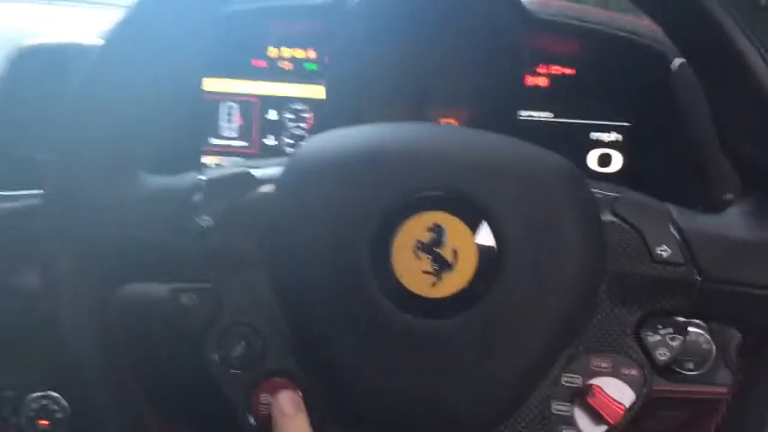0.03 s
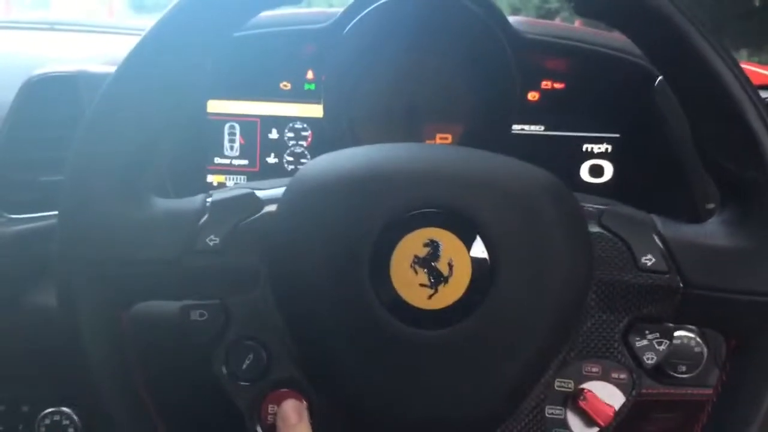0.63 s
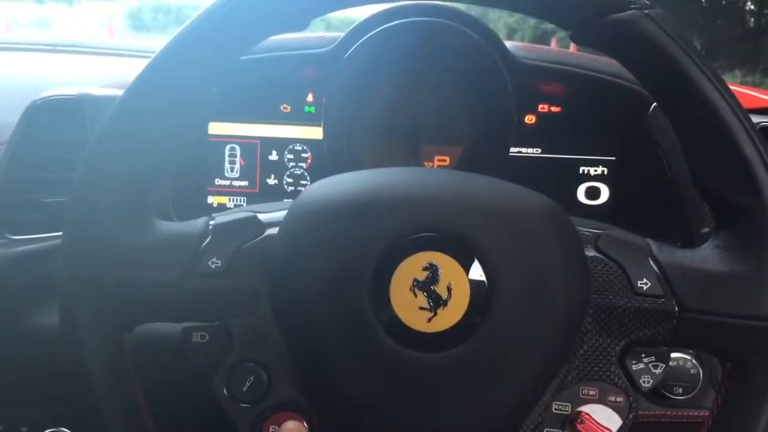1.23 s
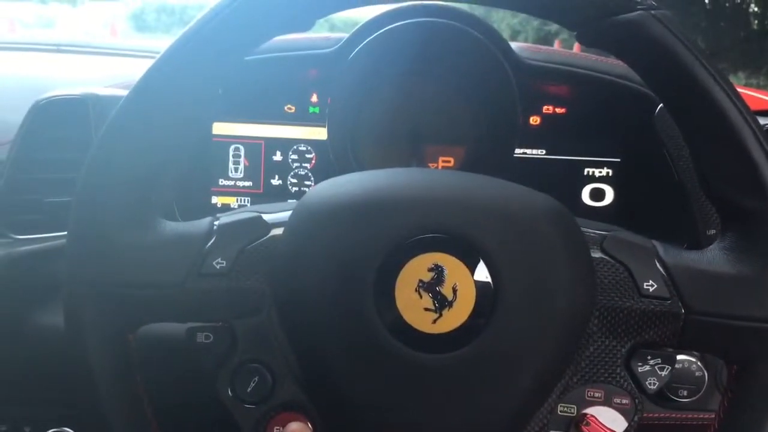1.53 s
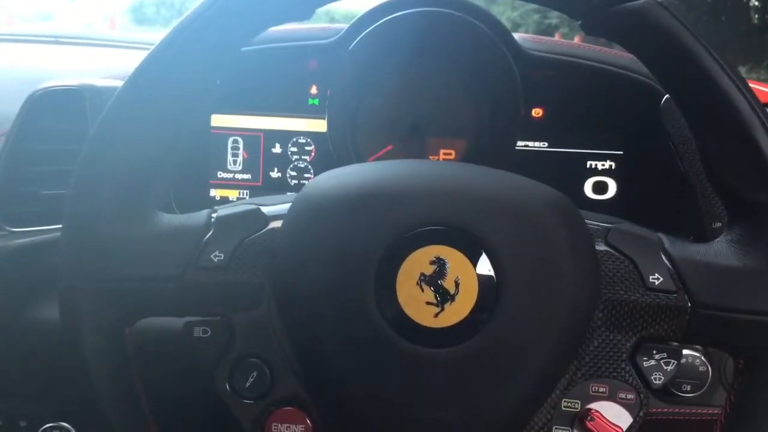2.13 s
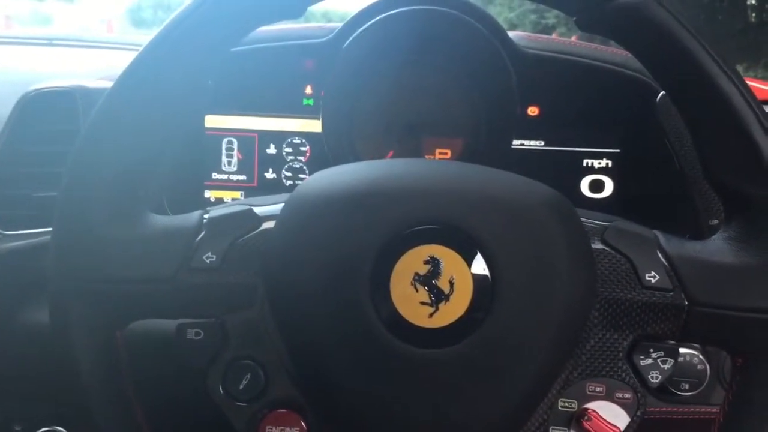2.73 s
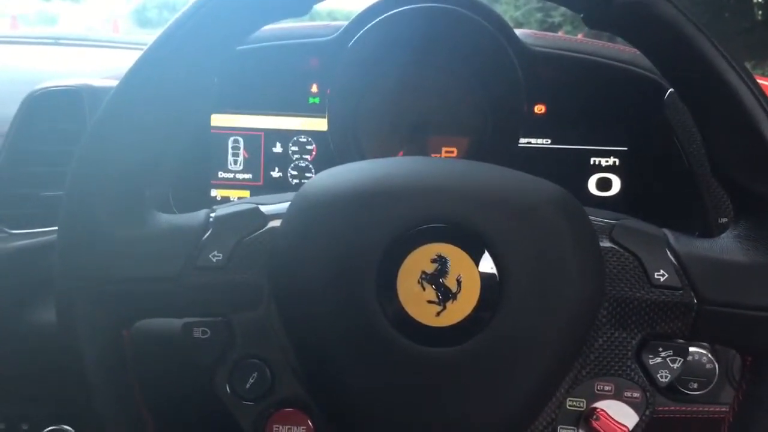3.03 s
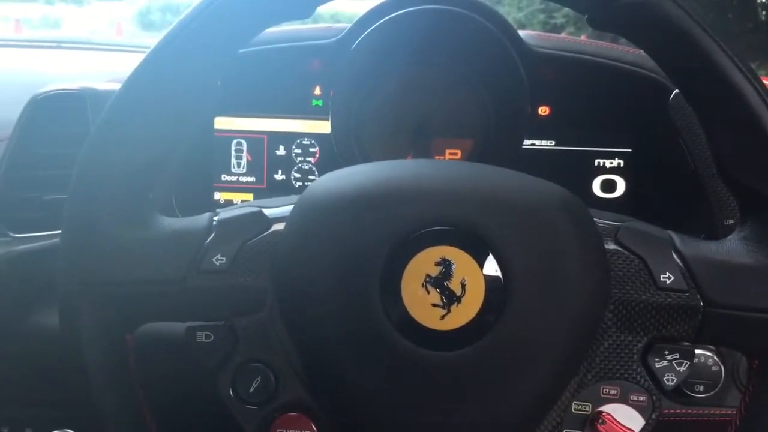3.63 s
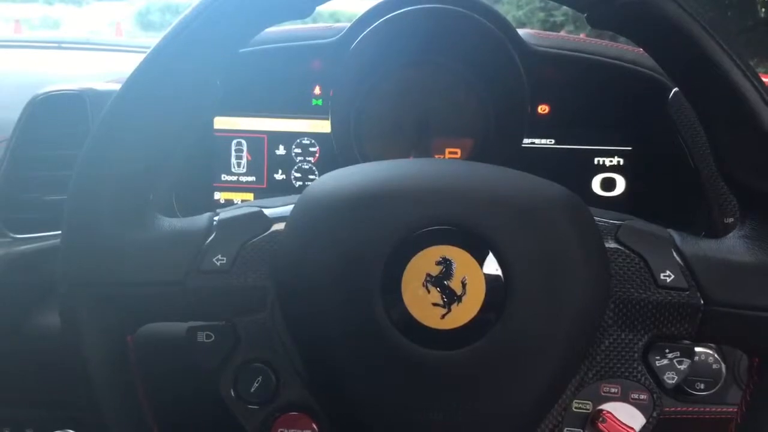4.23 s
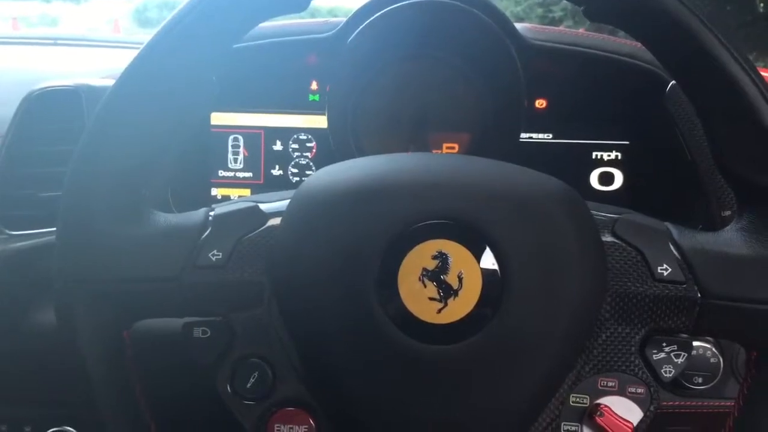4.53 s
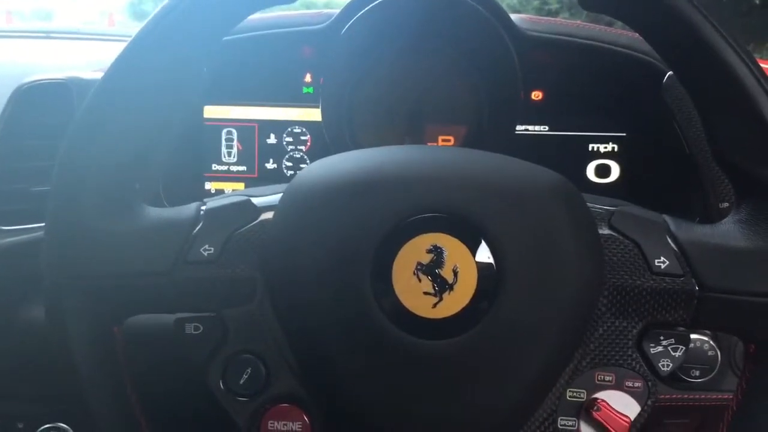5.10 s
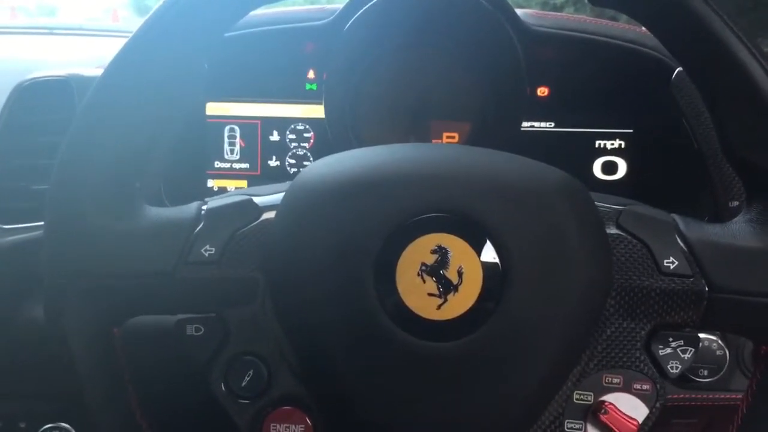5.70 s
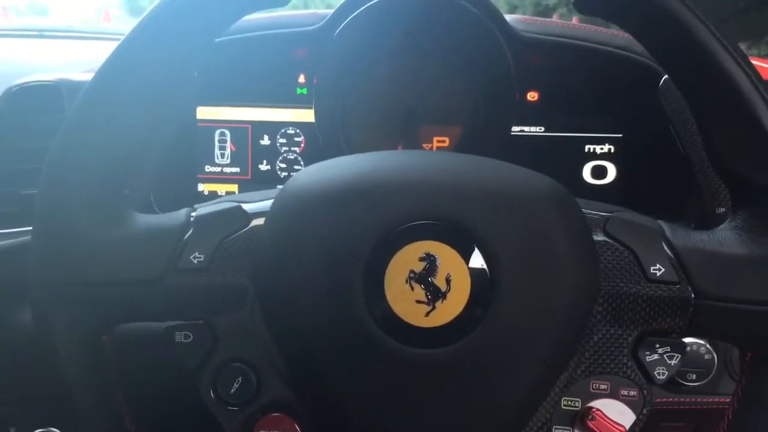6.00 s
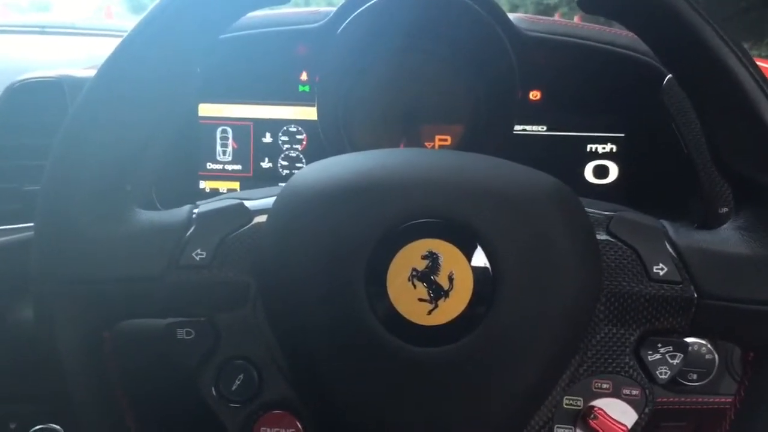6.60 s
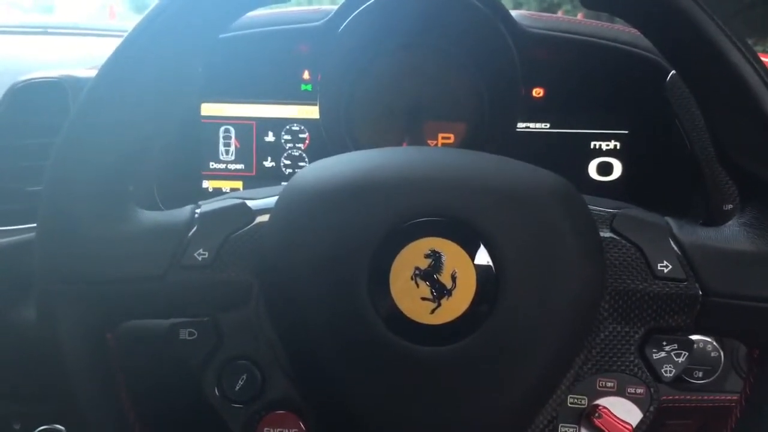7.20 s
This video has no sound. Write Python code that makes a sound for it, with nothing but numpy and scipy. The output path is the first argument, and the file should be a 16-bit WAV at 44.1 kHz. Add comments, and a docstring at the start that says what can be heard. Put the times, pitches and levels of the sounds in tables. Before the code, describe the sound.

A sports car's starter cranks briefly, the V8 fires with a loud flare, then sinks to a steady idle, heard from inside.

```python
"""A sports car's V8 starts, flares and sinks to idle, heard from the driver's seat.
Over the ventilation fan a relay clicks and the starter's gears grind against each compression.
Once the engine catches, its periodic firings drive the exhaust, whose harmonics boom and growl as they
sweep through pipe and cabin resonances. The boom drops away when the exhaust flaps close;
combustion roar, valve rattle and injector ticks carry on at the pace of the crankshaft."""
import numpy as np
from scipy import signal
from scipy.fft import rfft, irfft, next_fast_len
from scipy.io import wavfile
from scipy.ndimage import uniform_filter1d, map_coordinates
import sys
import numpy as np
from scipy import signal
from scipy.fft import rfft, irfft, next_fast_len
from scipy.io import wavfile
from scipy.ndimage import uniform_filter1d, map_coordinates

SR = 44100
rng = np.random.default_rng(int(sys.argv[2]) if len(sys.argv) > 2 else 0)


def materialize(psi):
    """Save the field psi as 16-bit PCM at rate SR to the path in sys.argv[1].

    A 1-D psi becomes a single channel; in a 2-D psi each row is a channel.
    """
    bounded = np.clip(np.atleast_2d(psi).T, -1, 1)
    quanta = np.round(bounded * 32767).astype(np.int16)
    wavfile.write(sys.argv[1], SR, quanta)


N = 324135

FIRE_S, STUMBLE_END_S = 1.7, 2  # first firing; the boom's start-up stumble has died away
SETTLE_S, SETTLED_S = 5.38, 6.04  # the idle grows gruffer between these times
# the throttle opens for the flare, shuts, then opens a little to cushion the fall: time_s, load_db
LOAD = [(1.7, 1), (1.82, 16), (2.05, 14), (2.14, 9.5), (2.4, 1), (2.76, 0), (2.92, 3.5), (3.4, -1.5),
        (4.1, -2), (5.6, -1.5), (6.9, -1.5), (7.35, -0.5)]
# cylinders that fail to fire: centre_s, half_length_s, share_lost, shudder_db
MISFIRES = [(1.804, 0.016, 1, -31.5), (1.898, 0.0067, .7, -21.5), (2.475, 0.03, 0.66, -31)]


def boom(firing, rate, per_load=0.65, flutter_db=1.0, stumble_db=2.5, uneven_db=4.0, lope_db=1.0):
    """Forced resonance: each low exhaust order swells as it sweeps through a peak of pipes and cabin."""
    # exhaust orders: firing_multiple, flaps_open_db, closing_change_db
    orders = [(.5, -15.5, -3), (1, 2, -15), (1.5, -16.5, -14), (2, 1.5, -3.5), (2.5, -28, 6), (3, -6, -14)]
    # transmission of the tailpipes and cabin: frequency_hz, gain_db
    response = [(25, -48), (33, -28.5), (40, -18), (46, -29), (53, -28.5), (60, -46), (68, -33.5),
                (103, -29), (136, -17), (185, -26.5), (230, -38), (330, -44.5), (450, -60)]
    ragged_db = flutter_db + stumble_db * (1 - ramp(FIRE_S, STUMBLE_END_S)) + lope_db * flaps()
    out = np.zeros(N)
    for order, open_db, change_db in orders:
        db = open_db + change_db * flaps() + gain_at(order * rate, response)
        is_half_order = order % 1 > 0
        db += ragged_db * wobble(45) + uneven_db * is_half_order * wobble(20)
        out += amp(db) * np.sin(2 * np.pi * order * firing)
    return np.sqrt(2) * amp(per_load * curve(LOAD)) * ramp(1.76, 1.81) * out


def growl(firing, rate, per_load=0.48, flaps_db=-7, flutter_db=3.0):
    """Pipe resonance picks out the higher harmonics in turn as the engine speed changes."""
    # higher exhaust orders: firing_multiple, level_db
    orders = [(4, -6), (5, -2), (6, -6.5), (7, -7.5), (8, -7.5)]
    # resonances of the pipe: frequency_hz, gain_db
    response = [(170, -60), (240, -56.5), (295, -48.5), (350, -44.5), (420, -56.5), (500, -50.5),
                (560, -58), (610, -59.5), (780, -48.5), (1000, -62.5)]
    out = np.zeros(N)
    for order, order_db in orders:
        db = order_db + gain_at(order * rate, response) + flutter_db * wobble(30)
        out += amp(db) * np.sin(2 * np.pi * order * firing)
    return np.sqrt(2) * amp(per_load * curve(LOAD) + flaps_db * flaps()) * ramp(1.5, 1.85) * out


def exhaust_pulses(firing, rate, rasp=0.15, flaps_db=-7, cold_db=6, idle_rise_db=4):
    """Source and filter: each firing sends a gas pulse, with turbulence behind it, down the pipe."""
    # transmission of the exhaust pipe: frequency_hz, gain_db
    pipe = [(25, -29.5), (60, 7), (115, 14), (200, -15.5), (300, 6), (400, -3), (560, -10.5), (800, -20),
            (1500, -42), (6000, -68.5)]
    at = strikes(firing)
    cylinder_db = np.resize([1.5, -1, 1, -1, 2, -1.5, 0, -1], len(at))
    scatter_db = 1.3 * rng.standard_normal(len(at))
    # the cold cylinders burn most unevenly at the top of the flare
    roughness = np.interp(rate[at], [90, 130], [.7, 2.6])
    sizes = amp(roughness * (cylinder_db + scatter_db)) / np.sqrt(rate[at])
    pulses = unit(np.bincount(at, sizes, N)) + rasp * unit(bursts(at, sizes, t60=0.032) * noise())
    db = drive(rate, idle_db=-48, per_load=.9, per_octave_db=-1.5) + flaps_db * flaps()
    db += cold_db * swell(1.896, .05) + idle_rise_db * ramp(6.1, 6.4)
    return ramp(FIRE_S, 1.8) * amp(db) * heard(pulses, pipe)


def shudder(firing, rate, chug=0.97, lag_s=0.029, jolt_s=.055):
    """Forced vibration: exhaust gusts shake the floor, harder as the engine rocks after a misfire."""
    # response of the floor: frequency_hz, gain_db
    floor = [(20, -36), (42, 4.5), (65, -9.5), (130, 10.0), (190, 1.5), (300, -34.0), (900, -67.5)]
    gusts = noise() * throb(firing, chug)
    steady = amp(drive(rate, idle_db=-40, per_load=-0.4, per_octave_db=8))
    jolts = sum(amp(db) * swell(s + lag_s, jolt_s) for s, _, _, db in MISFIRES)
    return ramp(FIRE_S, 1.8) * (steady + jolts) * heard(gusts, floor)


def catch(level_db=-14.0, pipe_hz=119, attack_s=0.063, hold_s=0.059, release_s=0.0091):
    """The first firings excite one low natural mode of the exhaust pipe."""
    end = FIRE_S + attack_s + hold_s
    envelope = ramp(FIRE_S, FIRE_S + attack_s) * (1 - ramp(end, end + release_s))
    return np.sqrt(2) * amp(level_db) * envelope * np.sin(2 * np.pi * pipe_hz * np.arange(N) / SR)


def barks(attack_s=0.017):
    """Damped resonance: each surge of gas excites one mode of the exhaust, which then decays."""
    # surges of gas: start_s, level_db, t60_s, pitch_hz
    surges = [(1.909, -19.5, .25, 321), (1.998, -27.5, 0.56, 518), (2.861, -39, 1, 503),
              (4.459, -32, 0.25, 335)]
    return sum(amp(db) * decay(s, t60) * ramp(s, s + attack_s) * ringing(hz, width=0.017)
               for s, db, t60, hz in surges)


def drone(firing, level_db=-46, pitch_hz=250):
    """A narrow noise band, amplitude-modulated at the firing rate, hums as the idle settles."""
    envelope = amp(level_db) * ramp(SETTLE_S, SETTLED_S) * ramp(5.5, 6.6)
    return envelope * throb(firing, depth=.5) * ringing(pitch_hz, width=0.17)


def combustion(firing, roar_db):
    """Combustion radiates broadband noise, amplitude-modulated by the firings."""
    # combustion roar: frequency_hz, density_db
    spectrum = [(100, -27.5), (220, -1.5), (400, 0.5), (600, 4), (1100, -1), (1450, -2), (2350, -8),
                (2800, -13.5), (4500, -36.5), (15000, -44)]
    roar = heard(noise() * throb(firing, depth=0.15) * amp(1.4 * wobble(40)), spectrum)
    return ramp(1.66, 1.76) * amp(roar_db) * roar


def valve_gear(firing, roar_db, chatter_db=-4, clatter=0.83):
    """Impacts at twice the firing rate modulate a hiss; the valve covers chatter at their resonances."""
    # course of the valve hiss: time_s, level_db
    hiss_levels = [(1.88, -54), (1.98, -49.5), (2.14, -57), (2.7, -58), (3.05, -55.5), (4.3, -60),
                   (6.4, -61.5), (7.35, -60.5)]
    # valve hiss: frequency_hz, density_db
    spectrum = [(1200, -29), (2500, 0), (3600, 2.5), (4500, -0.5), (6200, -5.5), (7300, -13.5),
                (10300, -16), (12300, -13), (15000, -15.5)]
    hiss_db = curve(hiss_levels)
    at = strikes(2 * firing)
    taps = unit(bursts(at, amp(2.5 * rng.standard_normal(len(at))), t60=.03))
    hiss = heard(noise() * (1 + clatter * taps), spectrum)
    chatter = unit(sum(amp(4.5 * wobble(60)) * ringing(hz, width=.06) for hz in (1850, 2200)))
    return ramp(1.9, 1.901) * (amp(hiss_db) * hiss + amp(chatter_db + (roar_db + hiss_db) / 2) * chatter)


def starter(grind_db=-47.5, shake_db=-42, whine_db=-7, backlash=.014, compression_s=0.026):
    """Periodic tooth contact grinds and whines, hardest at each compression, as the engine rocks."""
    # whine of the pinion, slowed by the compressions: time_s, pitch_hz
    pinion = [(1.13, 1500), (1.2, 3100), (1.275, 3900), (1.335, 3400), (1.41, 2350), (1.45, 2300),
              (1.5, 2742), (1.65, 1648), (1.8, 1533)]
    # compressions that load the starter: centre_s, grind_db, shake_db
    compressions = [(1.18, -47.5, -54), (1.305, -45, -44), (1.419, -48.5, -40), (1.59, -53, -45),
                    (1.746, -48.5, -24.5)]
    # grinding teeth: frequency_hz, density_db
    spectrum = [(200, -19.5), (550, -0.5), (900, 1.5), (1500, 3), (2300, 2), (3000, -7.5), (4500, -10.5),
                (6300, -12), (7500, -24.5), (11000, -32.5), (15000, -25.5)]
    # response of the engine mounts: frequency_hz, gain_db
    mounts = [(16, -41.5), (33, -4.5), (45, -4), (80, -9.5), (300, -65.5)]
    load = amp(grind_db) + sum(amp(db) * swell(s, compression_s) for s, db, _ in compressions)
    rock = amp(shake_db) + sum(amp(db) * swell(s, compression_s) for s, _, db in compressions)
    mesh = np.cumsum(curve(pinion) * (1 + backlash * wobble(500))) / SR
    grind = heard(noise() * throb(mesh / 4, depth=0.49), spectrum)
    whine = sum(amp(2 * wobble(110)) * np.sin(2 * np.pi * mesh / k) for k in (1, 2, 4))
    gears = grind + amp(whine_db) * ramp(1.0, 1.37) * whine
    shake = ramp(1.15, 1.2) * heard(noise(), mounts)
    engaged = ramp(1.12, 1.163) * (1 - ramp(1.734, 2.2))
    return engaged * (load * gears + rock * shake)


def overrun(brush_db=-55, skate_db=-48):
    """Sliding friction: pawls brush the clutch ring, then skate as the engine overtakes the starter."""
    # rasp of the pawls: frequency_hz, density_db
    spectrum = [(1500, -21), (3500, 0), (6300, -3), (7500, -13.5), (15000, -19.5)]
    rasp = heard(noise() * amp(2.3 * wobble(250)), spectrum)
    level = amp(brush_db) * ramp(1.5, 1.501) + amp(skate_db) * ramp(1.64, 1.675)
    return level * (1 - ramp(1.77, 1.952)) * rasp


def clacks(ring_db=-5, attack_s=.009):
    """Impact excitation: gear blows scatter through the body as noise and ring the housing."""
    # starter gear clacks and small knocks: start_s, level_db, t60_s, pitch_hz, relative_crash_db
    impacts = [(1.126, -28, 0.19, 1860, -4.5), (1.157, -27.5, 0.074, 1900, -9.5),
               (1.16, -23, .1, 180, -41.5), (1.315, -32.5, 0.14, 935, -34.5),
               (1.407, -28.5, 0.11, 2330, -15.5), (1.565, -28, 0.097, 1950, -2),
               (1.635, -32.5, 0.12, 1780, -6.5), (1.734, -30.5, 0.075, 2260, -16),
               (1.84, -25, 0.083, 2430, -19), (1.915, -33.5, 0.12, 2280, -17),
               (4.339, -38.5, 0.16, 1100, -15), (6.944, -32.5, 0.082, 1980, -6)]
    # crash of the gears: frequency_hz, density_db
    spectrum = [(200, 3), (1000, -9), (1900, -1.5), (2600, -5), (4000, -7.5), (6000, -9.5), (8000, -17),
                (15000, -26)]
    crash, out = heard(noise(), spectrum), np.zeros(N)
    for s, db, t60, hz, crash_db in impacts:
        blow = amp(db) * decay(s, t60) * ramp(s, s + attack_s)
        out += blow * (amp(crash_db) * crash + amp(ring_db) * ringing(hz, width=0.044))
    return out


def clicks(gain_db=-5, t60=0.06):
    """Small, light parts resonate high: each relay or linkage impact rings in one band."""
    # relay and linkage impacts: start_s, level_db, pitch_hz
    impacts = [(1.0713, -36, 6700), (1.0815, -47.5, 13800), (1.1094, -53, 7800), (1.336, -45.5, 9100),
               (1.8682, -38.5, 6820), (1.878, -43.5, 13400)]
    return sum(amp(db + gain_db) * decay(s, t60) * ringing(hz, width=0.11) for s, db, hz in impacts)


def injectors(firing, level_db=-69, scatter_db=5, fade_db=-4):
    """An impulse train, two thin ticks a turn, is smeared by the bulkhead and softens at idle."""
    # injector tick: frequency_hz, density_db
    spectrum = [(3000, -36.5), (9000, -21.5), (11000, -13), (12300, -0.5), (13300, -14.5), (15000, -11.5)]
    at = strikes(firing / 2)
    sizes = amp(scatter_db * np.clip(rng.standard_normal(len(at)), -2, 1.3))
    smeared = uniform_filter1d(bursts(at, sizes, t60=.04), size=330)
    return amp(level_db + fade_db * ramp(5.0, 6.5)) * ramp(1.9, 3.3) * heard(smeared * noise(), spectrum)


def fan(level_db=-38.0, ease_db=-8, drift=0.0111):
    """Turbulent air rushes, easing once the engine runs; fan and fuel pump rotation adds wavering tones."""
    # ventilation rush: frequency_hz, density_db
    spectrum = [(20, -17.5), (60, -9.5), (140, -0.5), (235, 5), (320, -8.5), (500, -22.5), (1050, -18.5),
                (1400, -25), (2000, -26.5), (2350, -24.5), (3300, -34.5), (6000, -45.5), (9500, -52.5),
                (15000, -56)]
    # fuel pump and fan tones: pitch_hz, level_db
    tones = [(215, -56), (533, -67.5), (711, -76), (900, -63.5), (1626, -70), (2153, -66.5), (2842, -82),
             (5471, -87.5)]
    out = amp(level_db + 1.1 * wobble(9) + ease_db * ramp(1.7, 4.4)) * heard(noise(), spectrum)
    for hz, db in tones:
        peak = np.sqrt(2) * amp(db + 3.3 * wobble(20))
        cycles = np.cumsum(hz * (1 + drift * wobble(60))) / SR
        out += peak * np.sin(2 * np.pi * cycles)
    return out


def reverberation(x, t60=0.044, wet=0.42):
    """Reflections from glass and trim merge into a short exponential tail."""
    t = np.arange(SR // 4) / SR
    tail = rng.standard_normal(len(t)) * amp(-60 * t / t60) * (t > .002)
    tail = signal.sosfilt(signal.butter(2, 500, "high", fs=SR, output="sos"), tail)
    return (x + wet * signal.fftconvolve(x, tail / np.linalg.norm(tail))[:N]) / np.hypot(1, wet)


def heard(x, spectrum):
    """Minimum-phase filtering by a source's spectrum and the cabin's resonances; rms 1."""
    # cabin resonances and hollows: centre_hz, width_hz, gain_db
    cabin = [(238.6, 23, -3), (335.4, 103, 7.5), (426, 90, -0.5), (498, 24, 7), (547.3, 43, 6.5),
             (578, 89, -3), (652, 16, 5), (710, 13, 2), (823, 170, -2.5), (945, 38, 1), (1040, 14, 1),
             (1188.5, 33, 6.5), (1542, 280, -4), (1863, 100, 1.5), (1990, 12, -2.5), (2120, 120, 1),
             (2276, 14, 5.5), (2415, 110, 5), (2625, 424, -6.5), (2740, 61, 3), (4860, 410, -3.5)]
    size = 2 * next_fast_len(N // 2 + 8192)
    hz = np.fft.rfftfreq(size, 1 / SR)
    db = gain_at(hz + 1, spectrum)
    db += sum(gain / (1 + (2 * (hz - centre) / width) ** 4) for centre, width, gain in cabin)
    cepstrum = irfft(np.log(amp(db)))[:size // 2]
    return unit(irfft(rfft(x, size) * np.exp(rfft(2 * cepstrum, size)))[:N])


def drive(rate, idle_db, per_load, per_octave_db, idle_hz=45.5):
    """Level in dB, linear in the load and in octaves of speed above idle."""
    return idle_db + per_load * curve(LOAD) + per_octave_db * np.log2(np.maximum(rate / idle_hz, 1))


def flaps(start_s=4.45, travel_s=0.038):
    """0 while the exhaust flaps are open, 1 once they are shut."""
    return ramp(start_s, start_s + travel_s)


def amp(db):
    """Decibels to gain."""
    return 10 ** (np.asarray(db) / 20)


def unit(x):
    """Scale to rms 1."""
    return x / np.sqrt(np.mean(x ** 2) + 1e-20)


def curve(rows):
    """Linear interpolation of (time_s, value) rows at every sample."""
    return np.interp(np.arange(N) / SR, *np.transpose(rows))


def gain_at(hz, response):
    """Gain in dB of a frequency response, interpolated in log frequency."""
    knots_hz, db = np.transpose(response)
    return np.interp(np.log(hz), np.log(knots_hz), db)


def ramp(start_s, end_s):
    """Linear rise from 0 to 1."""
    return np.clip((np.arange(N) / SR - start_s) / (end_s - start_s), 0, 1)


def swell(centre_s, half_length_s):
    """Gaussian rise to 1 and fall."""
    return np.exp(-((np.arange(N) / SR - centre_s) / half_length_s) ** 2)


def throb(cycles, depth):
    """Sinusoidal amplitude modulation about 1."""
    return 1 + depth * np.cos(2 * np.pi * cycles)


def wobble(rate):
    """A smooth random curve, rate knots a second."""
    return map_coordinates(rng.standard_normal(int(N * rate / SR) + 4), [np.arange(N) * rate / SR])


def noise():
    """White noise."""
    return rng.standard_normal(N)


def ringing(hz, width):
    """Noise of rms 1 in one resonance; width is 1 / Q."""
    b, a = signal.iirpeak(hz, 1 / width, SR)
    return unit(signal.lfilter(b, a, noise()))


def strikes(cycles):
    """Samples at which a phase passes a whole number."""
    return np.flatnonzero(np.diff(np.floor(cycles)) > 0)


def bursts(at, sizes, t60):
    """Envelope of blows at the given samples, each falling 60 dB in t60 seconds."""
    return signal.lfilter([1], [1, -amp(-60 / (t60 * SR))], np.bincount(at, sizes, N))


def decay(start_s, t60):
    """Exponential envelope of one blow."""
    return bursts([int(start_s * SR)], [1], t60)


def scene():
    """Superposition of exhaust and machinery, with one crankshaft phase timing the firings."""
    # engine speed, four firings a turn: time_s, firing_hz
    speed = [(1.65, 16), (1.78, 74), (1.89, 109.5), (2.05, 142.9), (2.17, 149.8), (2.35, 139.3),
             (2.91, 92.3), (3.14, 79), (3.56, 64.1), (4.01, 51.9), (4.7, 45.9), (5.5, 44.6), (5.8, 45.5),
             (6.85, 45.5), (7.15, 48.8), (7.35, 47.3)]
    rate = curve(speed)
    firing = np.cumsum(rate) / SR  # phase in cycles
    burning = 1 - sum(lost * swell(s, half_length) for s, half_length, lost, _ in MISFIRES)
    roar_db = drive(rate, idle_db=-49.5, per_load=0.99, per_octave_db=2.0) + 4 * ramp(SETTLE_S, SETTLED_S)
    machinery = fan() + starter() + overrun() + clacks() + clicks()
    machinery += combustion(firing, roar_db) + valve_gear(firing, roar_db)
    exhaust = boom(firing, rate) + growl(firing, rate) + exhaust_pulses(firing, rate)
    exhaust += shudder(firing, rate)
    tailpipes = burning * exhaust + catch() + barks() + drone(firing)
    return (tailpipes + injectors(firing) + reverberation(machinery))[None]


def record(dry):
    """An ideal low-pass filter limits the bandwidth."""
    top_hz = 15400
    size = next_fast_len(N + SR // 2)
    return irfft(rfft(dry, size) * (np.fft.rfftfreq(size, 1 / SR) < top_hz), size)[:, :N]


dry = scene()
out = record(dry)
materialize(out)
```